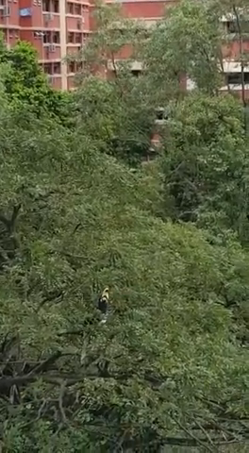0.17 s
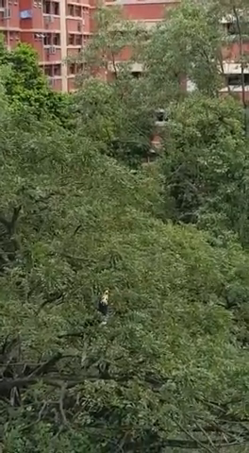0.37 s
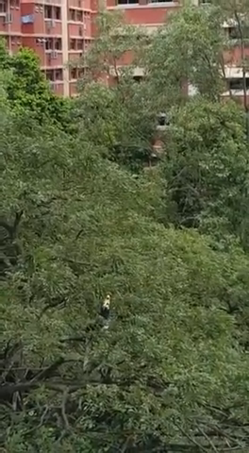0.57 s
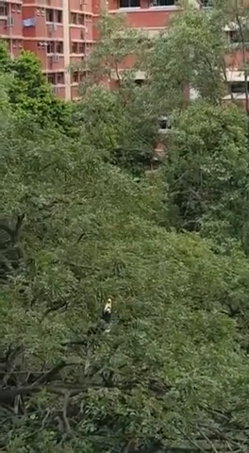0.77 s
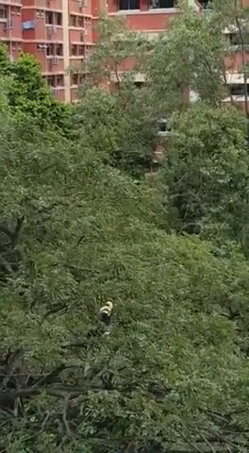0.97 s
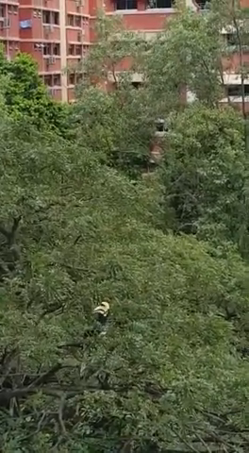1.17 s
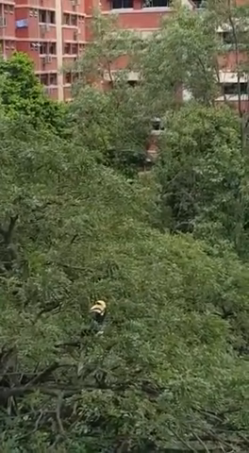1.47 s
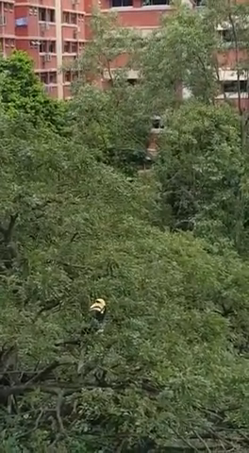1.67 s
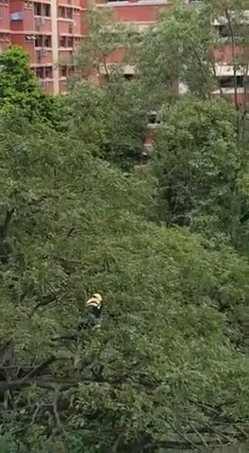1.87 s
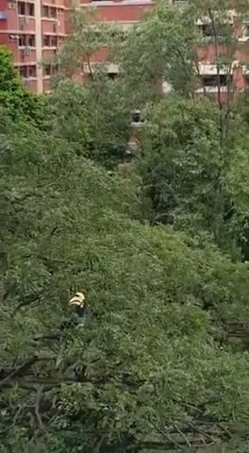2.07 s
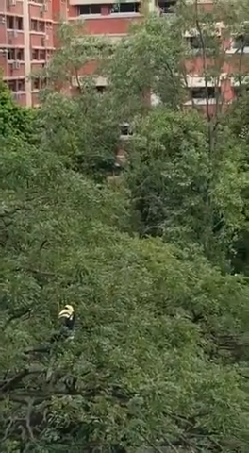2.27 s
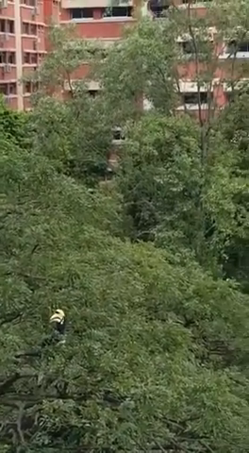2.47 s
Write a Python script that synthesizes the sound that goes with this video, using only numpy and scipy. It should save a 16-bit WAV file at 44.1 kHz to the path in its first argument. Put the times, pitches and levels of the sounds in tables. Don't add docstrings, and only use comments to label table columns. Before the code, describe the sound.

A large hornbill in a treetop gives three short harsh yelps near the end, echoing off leaves and house fronts, after a quiet stretch of low traffic rumble, droning engines and faint insects; handheld stereo phone outdoors.

```python
import sys
import numpy as np
from scipy import signal
from scipy.fft import rfft, irfft
from scipy.io import wavfile
from scipy.ndimage import uniform_filter1d

SR = 44100
rng = np.random.default_rng(int(sys.argv[2]) if len(sys.argv) > 2 else 0)


def persist_wave(psi):
    counts = np.round(np.clip(psi, -1, 1) * 32767).astype(np.int16)
    wavfile.write(sys.argv[1], SR, np.atleast_2d(counts).T)


def field_ratio(decibels):
    return 10 ** (np.asarray(decibels, dtype=float) / 20)


N = 115542


def level(x, db):
    return x * field_ratio(db) / np.sqrt(np.mean(x ** 2))


def read(table, hz):
    points, values = np.array(table).T
    return np.interp(np.log(hz + 1e-9), np.log(points), values)


def colour(x, gain):
    size = x.shape[-1]
    return irfft(rfft(x) * gain(np.fft.rfftfreq(size, 1 / SR)), size)


def band(hz, width):
    noise = rng.standard_normal(N)
    return level(colour(noise, lambda f: 1 / (1 + (2 * (f - hz) / width) ** 2)), 0)


def walk(rate, size=N):
    k = max(int(SR / rate), 1)
    steps = np.repeat(rng.standard_normal(N // 8)[:size // k + 1], k)
    return 1.3 * uniform_filter1d(uniform_filter1d(steps, k), k)[:size]


def pan(x, db):
    return x * field_ratio(np.array([[db / 2], [-db / 2]]))


# (frequency [Hz], level per Hz [dB])
CITY_SPECTRUM = [(15, -40), (25, -5.5), (156, -1.5), (281, -11.5), (945, -11), (2420, -25.5), (3000, -27.5),
                 (3530, -43), (15500, -60)]
# (frequency [Hz], side minus mid [dB])
CITY_WIDTH = [(60, -43), (110, -45), (200, -10.5), (380, -7), (700, -6.5), (1290, -1.5), (2380, -2),
              (4400, 2.5), (8120, -1), (15000, 8)]
# (frequency [Hz], left minus right [dB])
CITY_LEAN = [(60, 5.5), (110, -2), (200, 1), (380, 5.5), (700, 1.5), (1290, 1.5), (2380, 2), (4400, -1.5),
             (8120, 0.0), (15000, 7)]


def traffic():
    murmur, swell = 0, walk(0.27)
    for hz in 25 * 2 ** np.arange(0, 9.4, 1 / 3):
        flicker = 1.44 * walk(5.85)
        db = read(CITY_SPECTRUM, hz) + 10 * np.log10(hz) + 0.27 * swell + flicker
        mid = band(hz, hz / 3)
        side = band(hz, hz / 3) * field_ratio(read(CITY_WIDTH, hz))
        pair = field_ratio(db) * np.array([mid + side, mid - side])
        murmur = murmur + pan(pair, read(CITY_LEAN, hz))
    return level(murmur, -40.5)


def leaving_car(t):
    start_db, fade_db_s = -52.5, 19
    hiss = np.array([band(2990, 2330) for _ in range(2)])
    return hiss * field_ratio(start_db - fade_db_s * t)


# (frequency [Hz], width [Hz], level [dB], fade [dB per s])
HUMS = [(80, 22, -41, 6), (105, 14, -49, 0), (155, 30, -52, 0), (217, 14, -50, 0), (375, 25, -59, 0),
        (675, 40, -57, 0), (900, 60, -58, 0)]


def drones(t):
    return sum(band(hz, width) * field_ratio(db - fade * t) for hz, width, db, fade in HUMS)


# (time [s], firing rate [Hz], level [dB])
ENGINE_PATH = [(0.0, 146.7, -37.5), (0.25, 152.9, -42), (0.42, 142.5, -44), (0.48, 157, -39.5),
               (0.75, 165, -52.5), (0.91, 155.3, -39.5), (0.98, 170.9, -50), (1.07, 155.1, -43),
               (1.33, 147.5, -35.5), (1.36, 144.8, -42.5), (1.92, 150.7, -46), (1.96, 166.3, -56),
               (2.02, 151.1, -43.5), (2.22, 155.8, -42), (2.31, 147.1, -44.5), (2.43, 149.2, -41.5),
               (2.52, 173.3, -49), (2.62, 169.4, -40)]


def engine(t):
    s, hz, db = np.array(ENGINE_PATH).T
    firing_hz = np.interp(t, s, hz) + 3 * walk(15)
    return np.sin(2 * np.pi * np.cumsum(firing_hz) / SR) * field_ratio(np.interp(t, s, db) - 2.5)


# (frequency [Hz], width [Hz], level [dB], fade [dB per s], throb rate [per s], throb depth [dB])
INSECT_VOICES = [(3060, 90, -59.5, 0, 70, 1), (4020, 100, -60, 14, 40, 2), (2660, 300, -67, 6, 60, 1),
                 (12200, 900, -77, 0, 60, 1), (14900, 1400, -79, 0, 60, 1)]


def insects(t):
    out = 0
    for hz, width, db, fade, rate, throb_db in INSECT_VOICES:
        shared = band(hz, width)
        separate = np.array([band(hz, width), band(hz, width)])
        out = out + (shared + separate) * field_ratio(db - fade * t + throb_db * walk(rate)) / 2
    return out


def puff(t):
    start_s, rise_s, hold_s, t60_s = 1.822, 0.007, 0.063, 0.3
    age = t - start_s
    fade = field_ratio(-60 * np.clip(age - hold_s, 0, 1) / t60_s)
    hiss = np.array([band(5004, 13800) for _ in range(2)])
    return hiss * field_ratio(-60.5) * np.clip(age / rise_s, 0, 1) * fade


# (start [s], end [s], frequency [Hz], level [dB])
FAR_WHISTLE = (2.0, 2.1, 2862, -50)


def whistle(t):
    start, end, hz, db = FAR_WHISTLE
    tone = np.sin(2 * np.pi * np.cumsum(hz + 15 * walk(40)) / SR)
    fade_in_out = np.clip(np.minimum(t - start, end - t) / .02, 0, 1)
    return tone * field_ratio(db + 2 * walk(80)) * fade_in_out


# (frequency [Hz], width [Hz], level [dB])
RESONANCES = [(1185, 303, -12), (1650, 210, -3.5), (2280, 400, 0), (2950, 380, 4), (3570, 300, -3),
              (4604, 400, -8.5), (6014, 2400, -18.5), (7540, 300, -16.5), (8360, 400, -18),
              (10760, 200, -27), (10600, 200, -24), (14500, 2700, -23)]


def throat(f):
    low_hz, top_hz, air_db = 960, 11700, -9
    ring = 0
    for k, (hz, width, db) in enumerate(RESONANCES):
        ring = ring + (-1) ** k * field_ratio(db) * 1j * f * width / (hz ** 2 - f ** 2 + 1j * f * width)
    top = field_ratio(air_db) + 1 / (1 + (f / top_hz) ** 20)
    return ring * top / (1 + (low_hz / (f + 1)) ** 4)


# (time [s], pitch [Hz], level [dB])
YELP_PATHS = [
    [(2.09, 1150, -60), (2.0935, 1190, -35), (2.108, 1212, -30), (2.113, 1175, -29), (2.122, 1112, -30),
     (2.132, 1075, -27), (2.138, 1060, -35), (2.152, 1050, -50)],
    [(2.272, 1100, -60), (2.282, 1150, -40), (2.292, 1200, -28), (2.304, 1225, -24), (2.309, 1235, -33),
     (2.314, 1185, -27), (2.328, 1095, -29), (2.346, 1090, -45)],
    [(2.439, 980, -60), (2.448, 980, -38), (2.457, 1020, -29), (2.467, 1048, -26), (2.471, 1100, -32),
     (2.475, 1180, -28), (2.49, 1110, -33), (2.506, 1070, -47)],
]
ROUGHNESS = [
    [.9, .9, .65, .12, .06, .06, .3, .7],
    [.8, .7, .18, .07, .55, .14, .3, .6],
    [.9, .8, .5, .15, .55, .22, .45, .7],
]
PAIRED_CYCLES = [
    [.5, 1, 1.1, .6, .5, .25, .7, .9],
    [.3, .3, 0, 0, .3, .6, .7, .7],
    [.8, .9, 1, .9, 1, 1.4, 1.1, .9],
]
TRIPLE_CYCLES = [
    [0] * 8,
    [.5, .7, .8, .6, .4, .1, 0, 0],
    [0] * 8,
]


def bird():
    jitter_rad, jitter_rate, shimmer_db = 1.1, 1200, 4
    rasp_db, rasp_floor = -2, .2
    bright_hz, bright_per_db = 4000, .35
    out, effort = np.zeros(N), np.full(N, -40.)
    k = np.arange(1, 14)[:, None]
    for rows, rough, pairs, threes in zip(YELP_PATHS, ROUGHNESS, PAIRED_CYCLES, TRIPLE_CYCLES):
        s, hz, db = np.array(rows).T
        i = np.arange(int(s[0] * SR), int(s[-1] * SR))
        hz, db, rough, pairs, threes = (np.interp(i / SR, s, v) for v in (hz, db, rough, pairs, threes))
        shake, size = (walk(jitter_rate, size=4000)[:len(i)] for _ in range(2))
        phase = 2 * np.pi * np.cumsum(hz) / SR + jitter_rad * rough * shake
        pulses = np.cos(k * phase + k ** 2 / 2).sum(axis=0)
        pulses *= 1 + pairs * np.cos(phase / 2) + threes * np.cos(phase / 3)
        pulses *= field_ratio(shimmer_db * rough * size)
        breath = 3 * rng.standard_normal(4000)[:len(i)] * (1 + np.cos(phase))
        rasp = (rough + rasp_floor) * field_ratio(rasp_db) * breath
        out[i] = (pulses + rasp) * field_ratio(db)
        effort[i] = db - db.max()
    low = colour(out, lambda f: 1 / (1 + (f / bright_hz) ** 6))
    high = (out - low) * field_ratio(bright_per_db * effort)
    return colour(low + high, throat)


# (delay [s], level [dB], left minus right [dB])
HOUSE_ECHOES = [
    (.052, -17, 2),
    (.082, -25, 10),
    (.14, -33, 2),
]
# (frequency [Hz], width [Hz], share lost [0-1])
SIDEWAYS_DIP = (2900, 1600, .45)


def yard(x):
    tail_db, tail_t60_s, tail_dull_hz = -5.5, 0.72, 5460
    leaves_db, leaves_t60_s, leaves_dull_hz = -7, .06, 7000
    t = np.arange(SR) / SR
    noise = rng.standard_normal((2, 2, SR)) / np.sqrt(SR)
    fade = field_ratio(-60 * t / tail_t60_s + 6.3 * walk(55.7, size=SR)) * np.clip(t / 0.026, 0, 1)
    tail = level(fade, tail_db) * noise[0]
    for s, db, pan_db in HOUSE_ECHOES:
        tail[:, int(s * SR)] += pan(field_ratio(db), pan_db)[:, 0]
    leaves = level(field_ratio(-60 * t / leaves_t60_s), leaves_db) * noise[1]
    hz, width, lost = SIDEWAYS_DIP

    def tail_gain(f):
        dip = 1 - lost / (1 + (2 * (f - hz) / width) ** 2)
        return dip / (1 + (f / tail_dull_hz) ** 3)

    room = colour(tail, tail_gain) + colour(leaves, lambda f: 1 / (1 + (f / leaves_dull_hz) ** 2))
    return signal.fftconvolve(x[None], room, axes=1)[:, :N]


def tick(t):
    start_s, length_s = 2.434, .001
    return band(6000, 2500) * field_ratio(-50) * np.exp(-((t - start_s) / length_s) ** 2)


def scene():
    t = np.arange(N) / SR
    voice = bird()
    lag_s = 3e-5
    late = colour(voice, lambda f: np.exp(-2j * np.pi * f * lag_s))
    yelps = pan(np.array([late, voice]), -.9) + yard(voice)
    city = traffic() + leaving_car(t) + pan(drones(t) + engine(t), 0.79)
    return yelps + city + insects(t) + whistle(t) + puff(t) + tick(t)


def roll_off(x):
    return signal.sosfilt(signal.butter(12, 15740, fs=SR, output="sos"), x)


def record(dry):
    low_hz = 48.5
    mix = colour(dry, lambda f: 1 / (1 + (low_hz / (f + 1)) ** 3))
    return roll_off(mix)


dry = scene()
out = record(dry)
persist_wave(out)
```